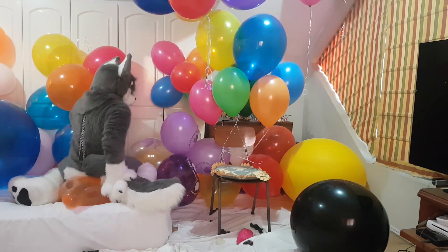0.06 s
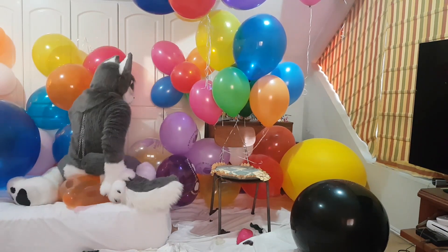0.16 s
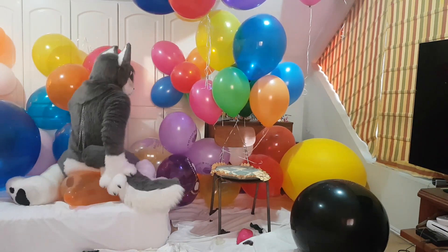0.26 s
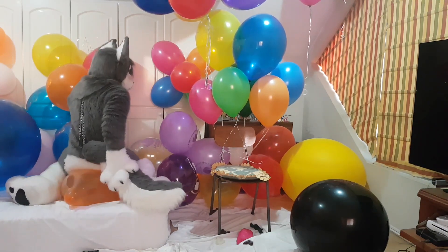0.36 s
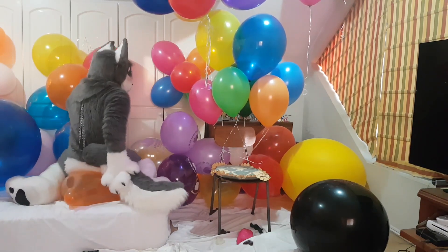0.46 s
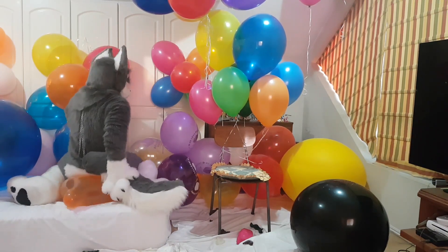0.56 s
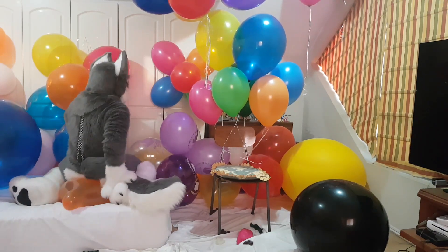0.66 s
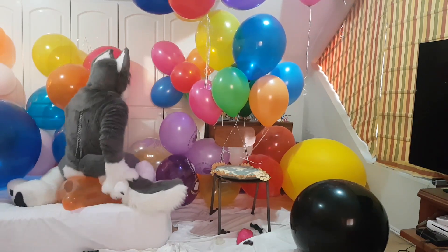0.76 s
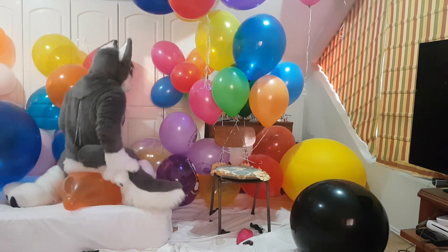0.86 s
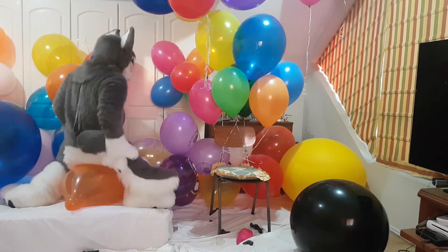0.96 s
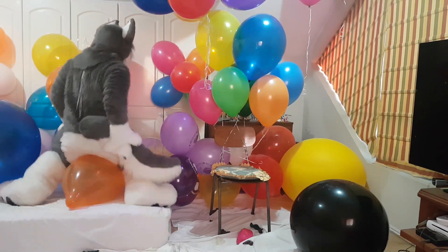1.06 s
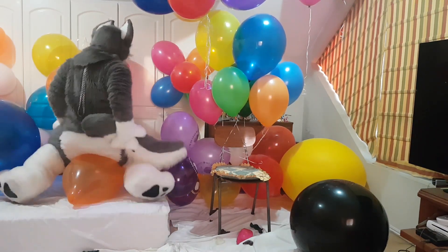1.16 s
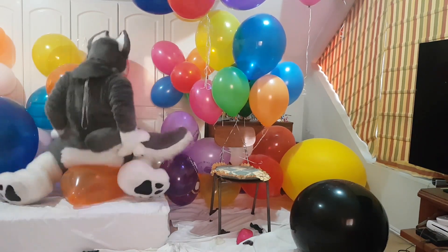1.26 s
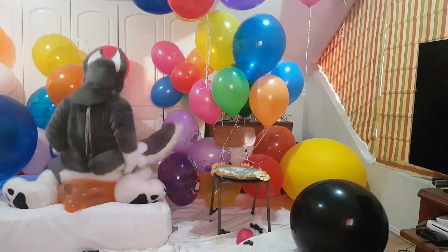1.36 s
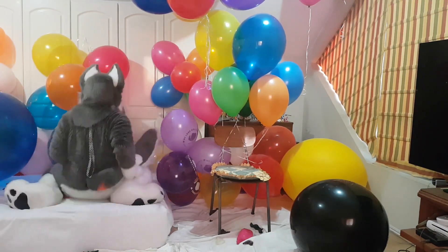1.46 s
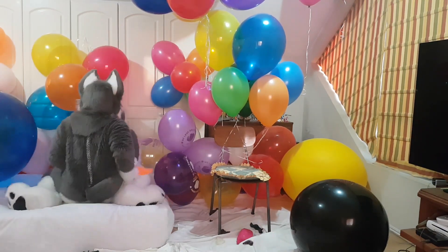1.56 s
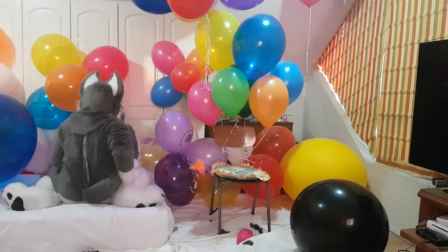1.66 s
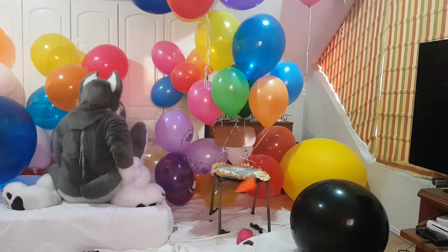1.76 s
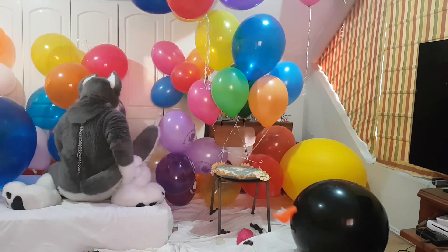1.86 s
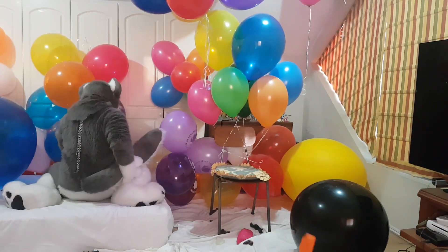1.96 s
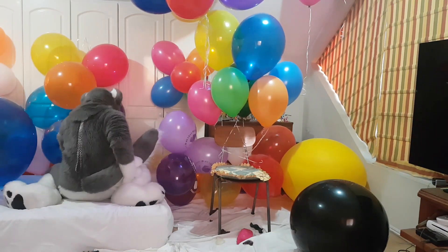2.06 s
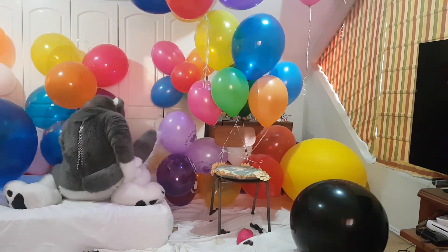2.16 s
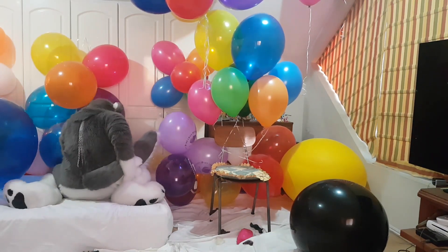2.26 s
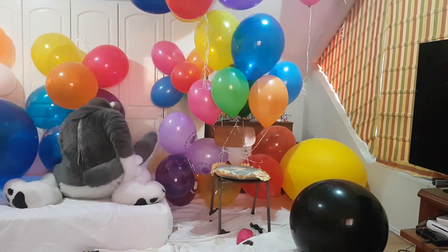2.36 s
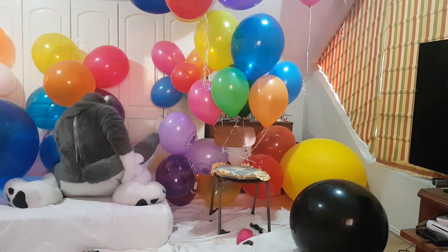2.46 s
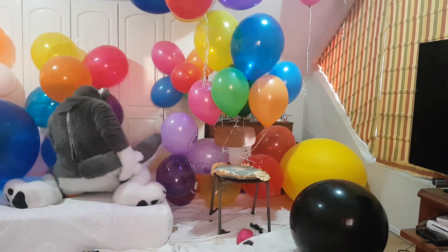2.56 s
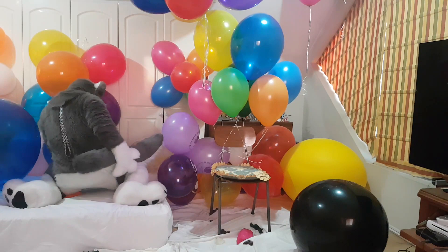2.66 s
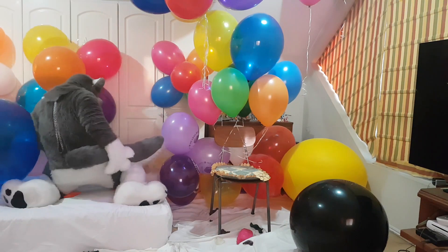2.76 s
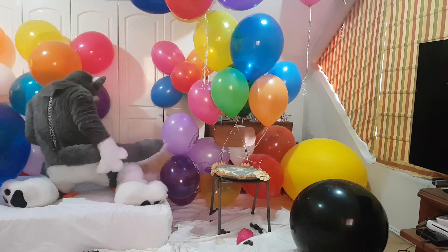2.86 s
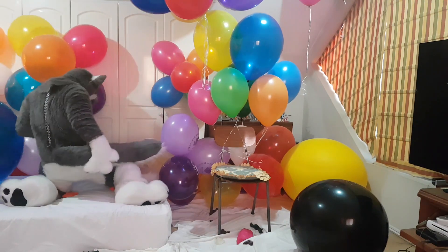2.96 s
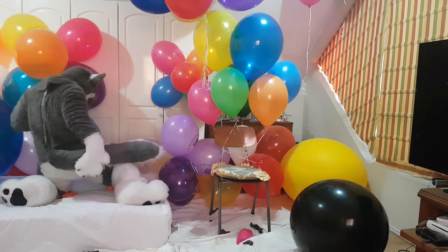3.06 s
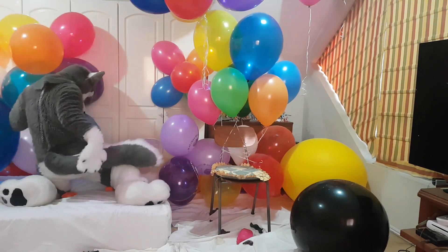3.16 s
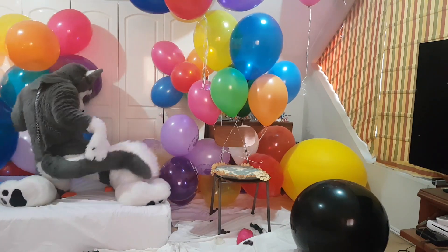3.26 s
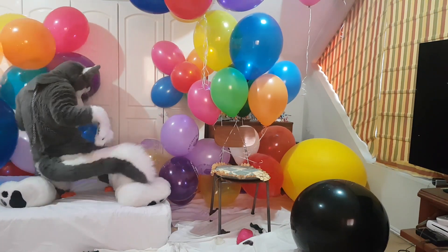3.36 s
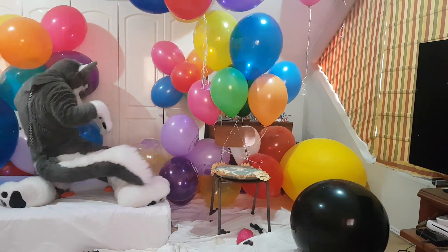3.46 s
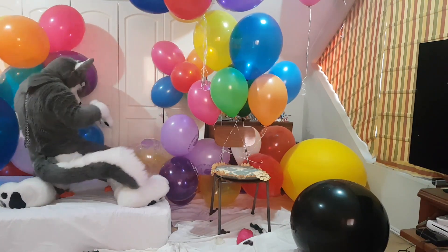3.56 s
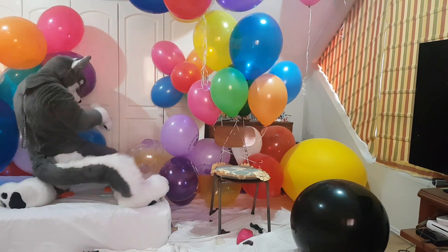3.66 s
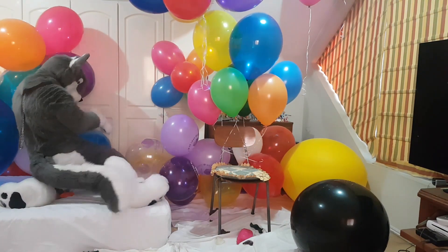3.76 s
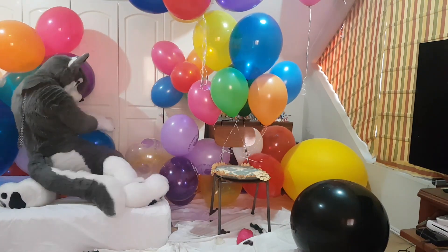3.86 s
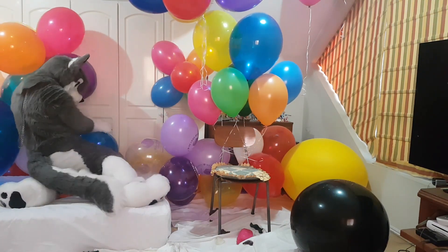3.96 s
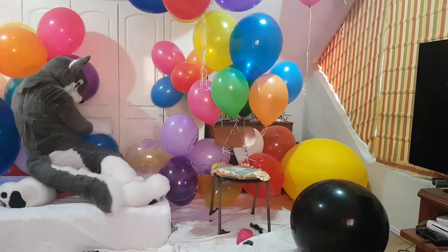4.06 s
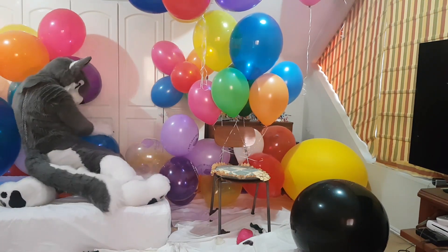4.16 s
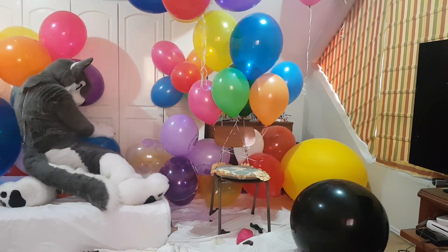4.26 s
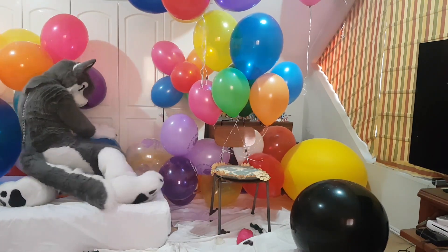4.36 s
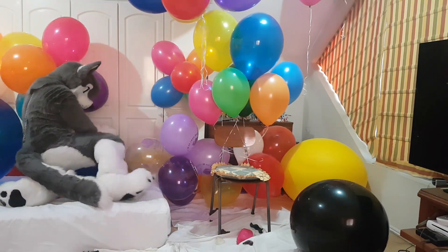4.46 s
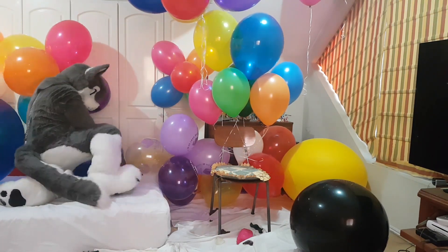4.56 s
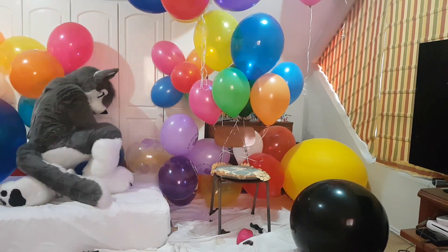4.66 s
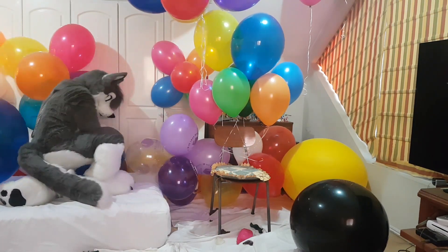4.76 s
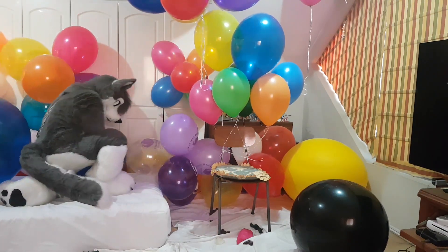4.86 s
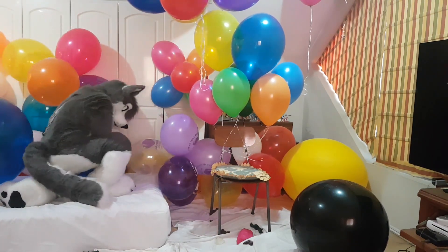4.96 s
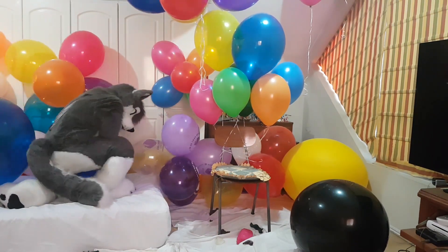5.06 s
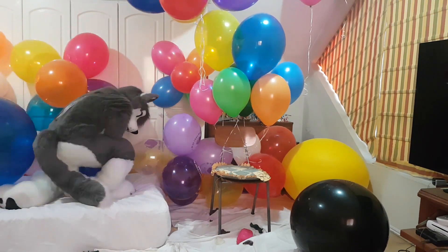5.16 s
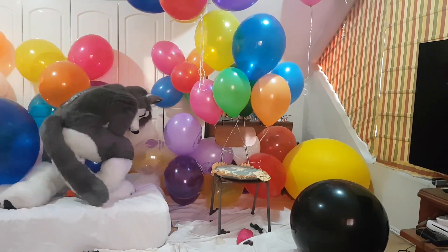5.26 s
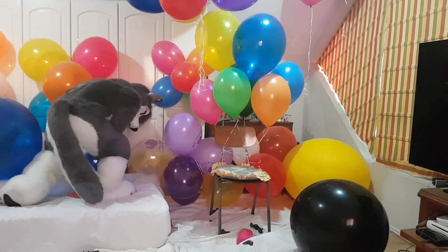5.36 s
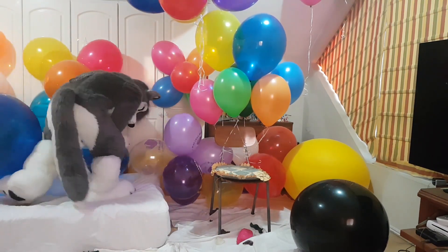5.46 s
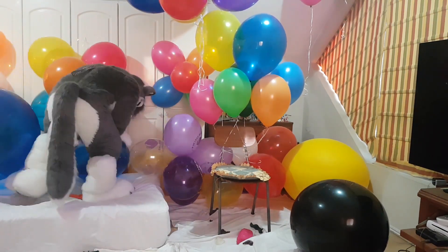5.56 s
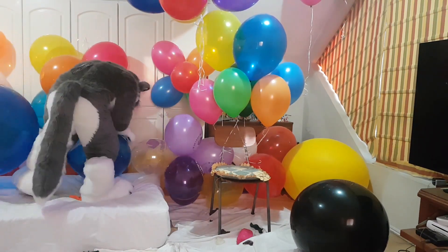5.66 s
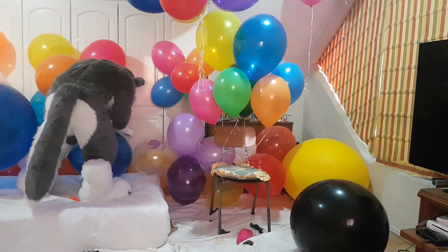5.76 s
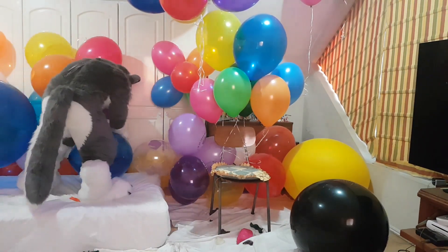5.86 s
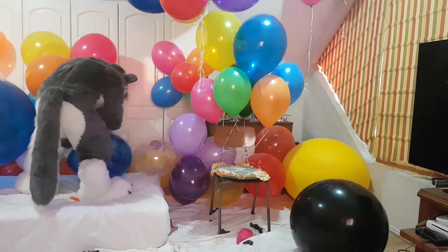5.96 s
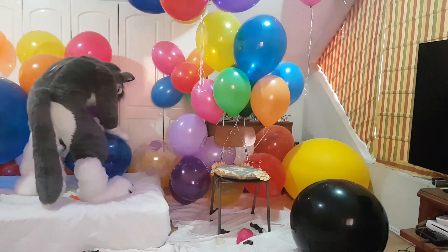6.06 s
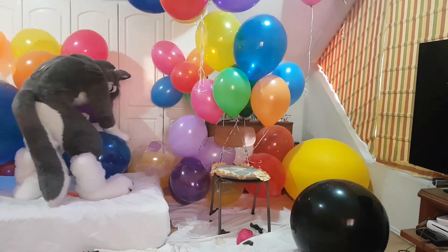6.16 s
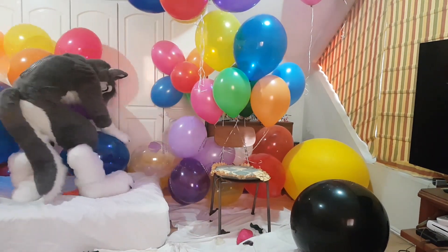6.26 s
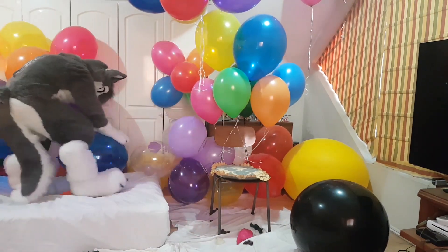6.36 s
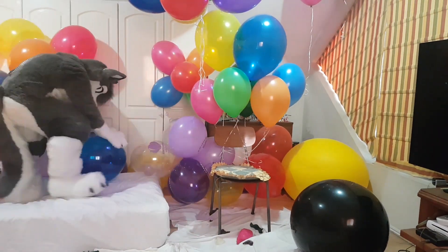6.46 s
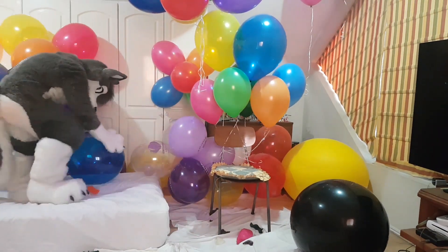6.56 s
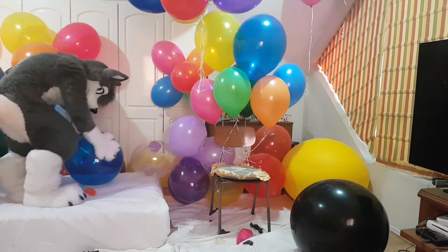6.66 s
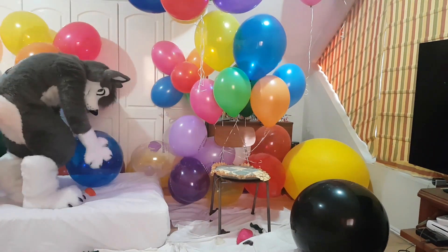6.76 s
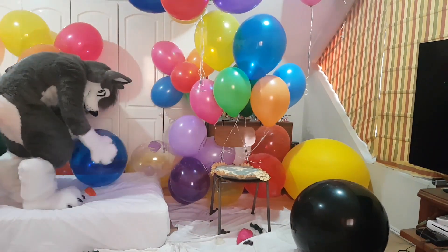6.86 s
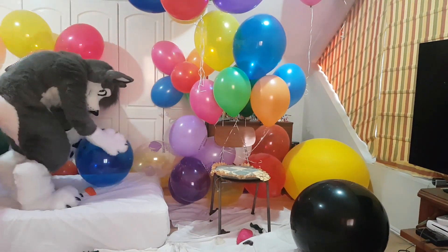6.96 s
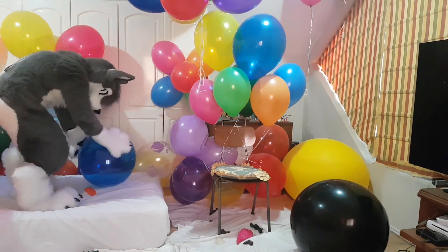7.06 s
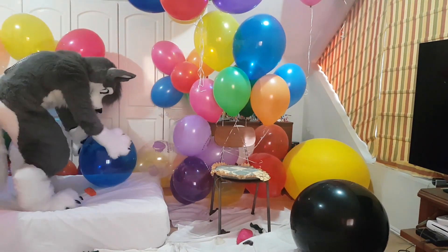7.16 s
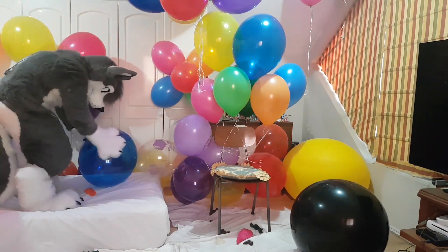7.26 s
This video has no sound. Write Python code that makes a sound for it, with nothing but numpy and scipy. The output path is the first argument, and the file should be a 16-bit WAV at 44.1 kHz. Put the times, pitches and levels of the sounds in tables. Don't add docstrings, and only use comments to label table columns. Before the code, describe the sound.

A person in a furry suit shifts on a mattress among balloons: quiet rustle, rubbery scuffs and soft thumps, quickening just before one violent, clipped balloon burst. The short room tail dies into a ducked hush. Fur and cloth gradually come back, latex jerks and squeaks, groans once and chirps sharply, and the movement grows busiest and loudest in the last second. Close stereo camera microphone, automatic gain.

```python
import sys
import numpy as np
from scipy import signal
from scipy.fft import rfft, irfft
from scipy.io import wavfile
from scipy.ndimage import uniform_filter1d

SR = 44100
rng = np.random.default_rng(int(sys.argv[2]) if len(sys.argv) > 2 else 0)


def generate_wav(signal):
    frames = np.transpose(np.atleast_2d(signal))
    scaled = np.clip(frames, -1, 1) * 32767
    pcm = np.round(scaled).astype(np.int16)
    wavfile.write(sys.argv[1], SR, pcm)


def decibels_to_gain(level_db):
    exponent = np.asarray(level_db, float) / 20
    return 10 ** exponent


N = 322812
BURST_S = 1.5109

# frequency in Hz, likeness -1 to 1.
PORT_LIKENESS = [(60, 0.94), (180, 0.98), (540, 0.59), (1630, -0.45), (4900, 0.32), (14700, 0.012)]
# frequency in Hz, likeness -1 to 1.
BURST_LIKENESS = [(60, .5), (180, .9), (540, .35), (1630, .1), (4900, 0), (9000, -.15), (14700, -.1)]


def evened(x):
    return x / np.sqrt(np.mean(x ** 2) + 1e-20)


def read(points, hz):
    f, value = np.transpose(points)
    return np.interp(np.log(hz + 1), np.log(f + 1), value)


def wander(count, smooth):
    once = uniform_filter1d(rng.standard_normal(count), int(smooth))
    return evened(uniform_filter1d(once, int(smooth)))


def coloured(x, gain_db):
    return irfft(rfft(x) * decibels_to_gain(gain_db), x.shape[-1])


def pair(colour, likeness):
    hz = np.fft.rfftfreq(N, 1 / SR)
    a, b = rfft(rng.standard_normal((2, N)))
    c = np.clip(read(likeness, hz), -1, 1)
    right = c * a + np.sqrt(1 - c ** 2) * b
    return irfft(np.array([a, right]) * decibels_to_gain(colour(hz)), N)


def humps(t, rows, rise_db_per_s, fall_db_per_s):
    s, db, hold = np.transpose(rows)[:3, :, None]
    rise_db = np.maximum(rise_db_per_s * (s - t), 0)
    fall_db = np.maximum(fall_db_per_s * (t - s - abs(hold)), 0)
    return decibels_to_gain(2 * (db - rise_db - fall_db))


def swing(after, hz, db, t60, phase=0.0):
    return decibels_to_gain(db - 60 * after / t60) * np.sin(2 * np.pi * (hz * after + phase))


def slips(rate_hz, orders, jitter):
    turns = np.cumsum(rate_hz * (1 + jitter * wander(len(rate_hz), smooth=35))) / SR
    return evened(sum(decibels_to_gain(db) * np.cos(2 * np.pi * (k * turns + rng.random())) for k, db in orders))


def ducking(t):
    recover_s = [.75, .65, .5, 0.43]
    since, hold_s = t - BURST_S, 0.76
    return (since > 0) * np.clip(1 - (since - hold_s) / np.c_[recover_s], 0, 1)


def moving(t):
    # time in seconds, effort in dB.
    effort = [(0, 0.5), (.2, -5.5), (.75, -3.5), (1.1, 2), (1.35, 0), (2.8, 3), (3.15, 8), (3.6, 1),
              (3.9, -3), (4.2, 2.5), (4.8, -1), (5.02, 3.5), (5.4, 0), (5.9, 6.5), (6.4, 16.5), (6.7, 5.5),
              (7.02, 3), (7.32, 15)]
    bed_level_db = [-68.5, -60, -59.5, -65.5]
    bed_follows = [0.55, 0.45, 0.97, 0.59]
    ducked_db = [19, 15, 17, 15]
    thump_colour_db = [-0.5, -14, -27.5, -33.5]
    stroke_colour_db = [-20.5, -1, -0.5, -14]
    brush_colour_db = [-35.5, -21, -13, 1.5]
    # start in seconds, level in dB, hold in seconds.
    thumps = [(0.185, -57.5, 0.13), (0.447, -63, .01), (0.622, -57.5, 0.11), (0.94, -60.5, 0.2),
              (1.156, -59, .01), (1.24, -46, .01), (1.327, -62, 0.065), (1.435, -41.5, .01),
              (1.502, -43, .02), (1.86, -61.5, 0.2), (2.55, -66, .05), (2.98, -59, .04),
              (3.09, -60, 0.0095), (4.92, -58, .05), (3.68, -56.5, 0.0083), (3.801, -51, 0.1),
              (4.031, -49, 0.053), (4.3, -53, 0.0092), (4.454, -49.5, 0.018), (4.58, -54, 0.011),
              (4.731, -54.5, 0.011), (5.22, -49, 0.015), (5.413, -56, 0.074), (5.66, -56, 0.01),
              (5.775, -50.5, 0.036), (5.896, -45.5, 0.024), (6.034, -41.5, 0.027), (6.285, -55, .01),
              (6.447, -56, 0.0091), (6.563, -38, 0.037), (6.693, -44.5, 0.019), (6.85, -40, 0.13),
              (6.79, -44, .02), (7.3, -43, .02), (1.8, -55, .03), (7.111, -39, 0.012)]
    # start in seconds, level in dB, hold in seconds, balloon body above the rub in dB.
    strokes = [(0.42, -56, 0.082, 8.5), (0.833, -67.5, 0.028, 18.5), (1.17, -61.5, 0.1, 3.5),
               (1.44, -63, 0.036, -2), (1.497, -44, .02, -15), (3.049, -49, 0.0061, -2.5),
               (3.26, -51, 0.15, -14), (3.7, -52.5, 0.031, 0), (3.843, -43.5, 0.011, -20),
               (4.054, -55, 0.017, -8), (4.301, -59, 0.012, 8.5), (4.539, -46, 0.045, 1),
               (4.701, -64, 0.042, -1), (5.168, -39.5, 0.061, 1), (5.361, -42, 0.1, -4.5),
               (5.612, -43, 0.068, -3.5), (5.793, -44, 0.032, -3), (6.026, -36.5, 0.022, -26),
               (6.365, -48, 0.18, 2.5), (6.546, -46, 0.022, -6), (6.85, -44, 0.028, -1),
               (7.123, -50, 0.02, -17), (7.303, -56, 0.024, -12)]
    # start in seconds, level in dB, hold in seconds.
    brushes = [(0.035, -59.5, 0.099), (.28, -61, 0.089), (0.587, -61, 0.099), (0.86, -54, .1),
               (1.045, -50, 0.13), (1.245, -57.5, 0.041), (1.406, -51.5, 0.044), (1.506, -40.5, 0.018),
               (2.74, -59.5, 0.043), (2.89, -55.5, 0.14), (3.21, -55, 0.12), (3.726, -58, 0.057),
               (3.91, -60, 0.039), (4.033, -56, 0.01), (4.17, -61, 0.093), (4.293, -60, 0.038),
               (4.43, -58, 0.16), (4.654, -64.5, 0.031), (5.15, -52.5, 0.029), (5.364, -56.5, 0.12),
               (5.8, -77, 0.032), (6.195, -55, 0.26), (6.523, -46, 0.045), (6.685, -50.5, .02),
               (6.88, -49, 0.028), (7.075, -56, 0.033), (7.24, -58, 0.04)]

    bed_db = np.outer(bed_follows, np.interp(t, *np.transpose(effort)))
    bed_db = bed_db - np.c_[ducked_db] * ducking(t) + np.c_[bed_level_db]
    stroke_db = np.c_[stroke_colour_db] + np.outer([0, 1, 0, 0], [row[3] for row in strokes])
    power = decibels_to_gain(2 * bed_db)
    power += decibels_to_gain(2 * stroke_db) @ humps(t, strokes, rise_db_per_s=141, fall_db_per_s=141)
    landing = humps(t, thumps, rise_db_per_s=251.5, fall_db_per_s=159.5).sum(0)
    power += decibels_to_gain(2 * np.c_[thump_colour_db]) * landing
    fur = humps(t, brushes, rise_db_per_s=149.5, fall_db_per_s=142.5).sum(0)
    power += decibels_to_gain(2 * np.c_[brush_colour_db]) * fur
    return 10 * np.log10(power)


def rustle():
    band_edges_hz = [25, 160, 600, 4000, 14500]
    # frequency in Hz, density in dB per Hz.
    friction = [(12, -38.5), (20, -5), (42, -6), (66, -10.5), (132, -1.5), (242, -6.5), (470, -7.5),
                (540, -10.5), (713, -11.5), (966, -10.5), (1170, -11), (1640, -11.5), (5690, -24),
                (13800, -22), (15000, -33.5)]
    # frequency in Hz, gain in dB.
    port_dip = [(5500, -0.5), (7300, -4.5), (8600, -0.5)]

    noise = pair(lambda f: read(friction, f) + read(port_dip, f), PORT_LIKENESS)
    hz, t, z = signal.stft(noise, SR, nperseg=1024, noverlap=896)
    levels = moving(t)
    edges = np.array(band_edges_hz)
    power = 2 / 1.5 * (abs(z) ** 2).mean((0, 2))
    own_db = [10 * np.log10(power[(hz >= lo) & (hz < hi)].sum()) for lo, hi in zip(edges, edges[1:])]
    lift_db = levels - np.c_[own_db]

    centres = np.sqrt(edges[1:] * edges[:-1])
    bands = np.arange(len(levels))
    place = np.interp(np.log(hz + 1), np.log(centres), bands)
    share = np.maximum(1 - abs(place[:, None] - bands), 0)

    patches = uniform_filter1d(rng.standard_normal(z.shape[1:]), size=8, axis=0)
    patches = evened(uniform_filter1d(patches, size=20, axis=1))
    lumps_db = read([(60, 1.1), (400, 3), (2000, 1.5), (10000, .7)], hz)[:, None] * patches
    z = z * decibels_to_gain(share @ lift_db + lumps_db)
    out = signal.istft(z, SR, nperseg=1024, noverlap=896)[1][:, :N]
    bass = signal.sosfiltfilt(signal.butter(2, 120, fs=SR, output="sos"), out)
    out, bass = (np.array([v[0], np.roll(v[1], 6)]) for v in (out, bass))
    flicker_db = .7 * wander(N, smooth=400) + .9 * wander(N, smooth=30)
    return bass + (out - bass) * decibels_to_gain(flicker_db)


def hum():
    return decibels_to_gain(-77 + 2.5 * wander(N, smooth=3000)) * slips(np.full(N, 112), [(1, 0)], jitter=.09)


def amplifier_hiss():
    duck_db = 10 * ducking(np.arange(N) / SR)[-1]
    return decibels_to_gain(-80.5 - duck_db) * rng.standard_normal((2, N))


def scuffs():
    # frequency in Hz, density in dB per Hz.
    dry_colour = [(59, -32.5), (100, -8.5), (513, -6.5), (814, 0), (1240, -6.5), (1630, -1), (3920, -4.5),
                  (5500, -10), (8880, -22), (15000, -25.5)]
    # start in seconds, level in dB, slips per s, length in seconds, brightness in dB per octave.
    squeaks = [(.247, -53, 335, 0.033, -7), (.252, -58, 960, 0.055, -11), (.245, -61, 1310, .055, -12),
               (0.499, -53, 600, 0.044, -4), (6.06, -50, 480, 0.044, -16), (6.19, -50, 1020, .035, -14),
               (6.98, -57.5, 880, 0.064, -16), (6.82, -45, 1800, .04, -9), (4.545, -45, 135, 0.062, -10),
               (4.2, -57, 356, 0.063, -17), (0.69, -55, 407, 0.053, -8), (0.74, -54, 410, 0.024, -16),
               (0.803, -56, 430, 0.052, -24), (0.849, -51.5, 420, 0.018, -11),
               (0.903, -54.5, 400, 0.036, -18), (1.165, -39, 268, 0.043, -39), (1.234, -48, 118, 0.02, 1),
               (3.29, -51.5, 540, 0.056, -12), (3.425, -60.5, 505, 0.12, -15), (3.49, -60, 500, 0.077, -21),
               (3.53, -58, 500, 0.068, -21), (3.23, -59.5, 560, 0.077, -14), (3.28, -55.5, 355, 0.073, -14),
               (3.28, -59, 620, .05, -14), (3.263, -54, 2070, .035, -14), (3.83, -41, 820, 0.026, -0.5),
               (3.885, -53.5, 910, 0.03, -13), (5.265, -43.5, 460, 0.085, -20),
               (5.893, -48, 1100, 0.035, -15), (5.988, -59, 46, 0.11, -10), (6.55, -48, 123, 0.085, -6),
               (6.823, -50, 45, 0.1, -14), (6.853, -41, 112, 0.063, -1), (7.184, -44.5, 1070, 0.044, -11),
               (7.205, -45, 1350, 0.047, -14), (7.212, -45.5, 1630, .035, -18),
               (7.216, -48, 1040, 0.044, -12), (7.255, -48, 840, 0.022, -9), (7.288, -47, 1130, 0.023, -13)]
    # start in seconds, level in dB, slips per s, length in seconds, squeak share 0-1.
    rubs = [(0.372, -44.5, 490, 0.038, 0.87), (0.487, -46, 520, 0.062, 0.52),
            (1.429, -46.5, 130, 0.022, 0.7), (3.019, -53.5, 360, 0.15, 0.01),
            (3.228, -49, 2440, 0.05, 0.65), (3.399, -57, 1460, 0.07, 0.5), (3.399, -55, 1660, 0.073, .6),
            (3.263, -53, 2000, 0.034, 0.4), (3.656, -45, 292, 0.03, 0.73), (4.247, -52.5, 330, 0.043, 0.13),
            (4.506, -43, 570, 0.069, 0.28), (5.388, -46, 2500, 0.06, 0.54), (5.94, -47.5, 1400, 0.044, 0.7),
            (5.976, -41, 790, 0.063, 0.3), (6.051, -44.5, 480, 0.09, 0.27), (6.35, -45.5, 322, 0.17, 0.78),
            (6.43, -48, 170, .08, 0.6), (6.8, -42, 690, 0.028, 0.1), (7.167, -45, 790, 0.033, 0.1)]
    # start in seconds, level in dB, slips per s, length in seconds, brightness in dB per octave.
    chirps = [
        (0.379, -42, 325, 0.073, -0.5),
        (5.559, -33.5, 860, 0.053, -0.5),
        (5.574, -34, 700, .04, -1.5),
        (5.588, -39, 2550, 0.035, -5),
        (5.611, -43, 890, 0.028, -4),
        (6.008, -31.5, 960, 0.037, -1),
        (5.985, -42, 2900, 0.038, -8),
        (5.99, -43.5, 2500, .02, -9),
        (5.58, -38, 1620, .04, -4),
    ]
    # start in seconds, level in dB, slips per s, length in seconds, brightness in dB per octave.
    jerks = [
        (3.796, -36, 820, 0.041, 1),
        (3.797, -37.5, 1650, 0.045, -2),
        (3.799, -40, 2480, 0.038, -2),
        (6.823, -33.5, 2700, 0.026, 0.5),
        (6.826, -37.5, 5050, 0.025, -6),
        (6.833, -36.5, 2200, 0.025, -2),
        (6.849, -35.5, 2350, 0.033, -2.5),
    ]

    rows = [(*row, .94, .8) for row in squeaks]
    rows += [(*row[:4], -3.5, row[4], .8) for row in rubs]
    rows += [(*row, .64, .9) for row in chirps]
    rows += [(*row, .68, .5) for row in jerks]
    out, t = np.zeros(N + 8192), np.arange(8192) / SR
    hz = np.fft.rfftfreq(len(t), 1 / SR)
    for s, level_db, rate_hz, length, tilt_db, share, skew in rows:
        share = np.clip(share, 0, 1)
        orders = [(k, (tilt_db - 5.0) * np.log2(k)) for k in range(1, 6) if k * rate_hz < 9000]
        squeak = slips(rate_hz + 0 * t, orders, jitter=.035 + .07 * (1 - share))
        tint_db = read(dry_colour, hz) + tilt_db * np.log2(hz / 800 + .1)
        dry = evened(coloured(rng.standard_normal(len(t)), tint_db))
        stroke = np.sin(np.pi * np.clip(t / length, 0, 1) ** skew) ** 1.5
        stroke = stroke * decibels_to_gain(2 * wander(len(t), smooth=80))
        at = round(s * SR)
        out[at:at + len(t)] += decibels_to_gain(level_db) * stroke * (np.sqrt(share) * squeak + np.sqrt(1 - share) * dry)
    return out[:N]


def room(x):
    # frequency in Hz, t60 in seconds.
    decay = [(100, .36), (500, .36), (1000, .36), (2000, .32), (8000, .3), (14000, .26)]
    taps = np.zeros((2, SR // 2))
    at = np.arange(150, SR // 2 - 20, 20)
    signs_shape = (2, len(at))
    at = at + rng.integers(0, 20, signs_shape)
    np.put_along_axis(taps, at, rng.choice([-1., 1.], signs_shape), 1)
    hz, t, z = signal.stft(taps, SR, nperseg=256)
    tail = signal.istft(z * decibels_to_gain(-60 * t / read(decay, hz)[:, None]), SR, nperseg=256)[1]
    return signal.fftconvolve(x[None], tail / np.linalg.norm(tail[0]), axes=1)[:, :N]


def flicks():
    # start in seconds, level in dB, hold in seconds, top above middle treble in dB,
    # chatter per s (1 or less: none).
    contacts = [(0.382, -44.5, 0.028, -4.5, 320), (0.492, -57, .03, 0, 320), (3.52, -57, 0.016, 0, 1),
                (3.672, -63, 0.011, 0, 0), (3.799, -50.5, 0.024, 2, 0), (5.558, -48, 0.02, 2, 0),
                (5.57, -48, 0.019, -2, 0), (5.957, -53, 0.018, -10, 3), (5.99, -50, .015, -8, 2),
                (6.01, -48, .015, -5, -0.5), (6.455, -42, 0.023, 3.5, 0), (6.728, -47, .01, 8.5, 0.5),
                (6.746, -41.5, 0.014, 2, 0), (6.821, -31.5, 0.02, -1.5, 0), (6.858, -50, .012, -2, 1)]
    # frequency in Hz, density in dB per Hz.
    fur_middle = [(2000, -11), (4000, -0.5), (6500, -3.5), (9000, -5.5), (11000, -40)]
    # frequency in Hz, density in dB per Hz.
    fur_top = [(6000, -20), (9000, 1), (13000, 2), (15000, -7)]

    t = np.arange(0, N, 10) / SR
    top_db, chatter_hz = np.transpose(contacts)[3:]
    chatter_hz = chatter_hz[:, None]
    power = humps(t, contacts, rise_db_per_s=2200, fall_db_per_s=280)
    chatter = (1 + np.cos(2 * np.pi * chatter_hz * t)) ** 2 / 1.5
    power = power * np.where(chatter_hz > 1, chatter, 1)
    middle = evened(pair(lambda f: read(fur_middle, f), PORT_LIKENESS))
    top = evened(pair(lambda f: read(fur_top, f), PORT_LIKENESS))
    gains = np.sqrt([power.sum(0) / 2, decibels_to_gain(2 * top_db) @ power / 2])
    middle_gain, top_gain = np.repeat(gains, 10, axis=1)[:, :N]
    return (middle * middle_gain + top * top_gain) * decibels_to_gain(1.1 * wander(N, smooth=31))


def shock_front(since):
    # seconds after the burst, level in dB, swing in Hz, t60 in seconds.
    returns = [(.0008, -11, 235, .04), (.0022, -2, 340, .025), (.0032, -10, 600, .04),
               (.0045, -10, 2800, .02), (.074, -14, 100, .15), (.0105, -8, 280, .03),
               (.0277, -2, 800, .018), (.0503, -3, 270, .035), (.0658, -4, 205, .035),
               (.0727, -2.5, 178, .12), (.0905, -6, 215, .06), (.131, -8, 290, .08)]
    # seconds after the burst, level in dB, swing in Hz, t60 in seconds.
    sideways = [
        (.004, -12, 245, .08),
        (.008, -16, 1100, 0.092),
        (.042, -17, 550, .07),
        (.07, -12, 110, .06),
        (.064, -18, 420, .06),
        (.085, -17, 270, .15),
    ]
    port_lag_s, length_s = .00022, .0009
    u = np.maximum(since - np.c_[[0, port_lag_s]], 0) / length_s
    shock = decibels_to_gain(9) * (u > 0) * (1 - u) * np.exp(-u)
    for s, db, swing_hz, t60 in returns:
        shock = shock - swing(np.maximum(since - s, 0), swing_hz, db, t60)
    for s, db, swing_hz, t60 in sideways:
        shock = shock + np.c_[[1, -1]] * swing(np.maximum(since - s, 0), swing_hz, db, t60)
    return shock


def boom(t, since, span):
    # frequency in Hz, density in dB per Hz.
    boom_colour = [(15, -53), (25, -24), (64, -18.5), (97, -9.5), (128, -5.5), (165, -5), (199, -3.5),
                   (285, -3.5), (334, -9.5), (362, -8), (472, -21.5), (518, -18.5), (600, -24), (780, -52),
                   (1320, -120)]
    # frequency in Hz, level in dB.
    room_modes = [(113, -18.5), (170, -17), (211, -13), (246, -9), (310, -9)]
    # start in seconds, level in dB, hold in seconds.
    surges = [
        (1.517, -15.5, 0.0019),
        (1.598, -12, 0.0085),
        (1.646, -18.5, 0.004),
        (1.705, -27, .01),
        (1.928, -62.5, 0.037),
        (2.054, -66, 0.0048),
    ]
    surge = np.sqrt(humps(t, surges, rise_db_per_s=302.5, fall_db_per_s=190).sum(0))
    modes = 0
    for hz, db in room_modes:
        level = decibels_to_gain(db + 2.5 * wander(len(t), smooth=700))
        phase = rng.random() + 0.057 * rng.standard_normal((2, 1))
        modes = modes + level * np.sin(2 * np.pi * (hz * since + phase))
    air = evened(pair(lambda f: read(boom_colour, f), BURST_LIKENESS))[:, span]
    return (0.77 * air + modes) * surge


def crack(since, span):
    # frequency in Hz, density in dB per Hz.
    crack_colour = [(290, -31.5), (500, -5), (673, -3.5), (722, -8.5), (820, -4), (1340, -11.5),
                    (1910, -10.5), (1990, -13), (2360, -10), (3710, -16), (4040, -13), (13200, -16.5),
                    (14600, -16.5)]
    # frequency in Hz, gain in dB.
    early = [(500, 5.5), (1000, 4.5), (1900, 12), (2800, 13), (5000, 5), (12000, 8.5)]
    # frequency in Hz, loss in dB per s.
    loss = [(500, 15), (1000, -20), (2000, 14.5), (8000, 10.5), (11500, 30), (14000, 60), (15000, 130)]
    limited_s = 0.14
    level_db = -8.5 - 114 * np.minimum(since, limited_s) - 202 * np.maximum(since - limited_s, 0)
    noise = evened(pair(lambda f: read(crack_colour, f), BURST_LIKENESS))[:, span]
    hz, frames, z = signal.stft(noise, SR, nperseg=256, noverlap=192)
    age = np.minimum(frames, .5)
    z = z * decibels_to_gain(np.outer(read(early, hz), np.exp(-age / .03)) - np.outer(read(loss, hz), age))
    noise = signal.istft(z, SR, nperseg=256, noverlap=192)[1][:, :len(since)]
    return noise * decibels_to_gain(level_db + 2.2 * wander(N, smooth=60)[span])


def ringing(since):
    # frequency in Hz, level in dB, t60 in seconds.
    neighbours = [(113, -23, 1.2), (800, -12, .4), (937, -6, .48), (1082, -11, .4), (1228, -7, .5),
                  (1362, -13, .45)]
    # frequency in Hz, level in dB, t60 in seconds.
    shreds = [(1526, -16.5, 0.21), (1780, -16.5, .13), (1892, -15.5, 0.14), (2090, -18, 0.15),
              (2350, -18, .13), (2800, -15, 0.11), (8760, -24.5, 0.2), (11480, -24.5, 0.22),
              (12590, -24, 0.27)]
    out = 0
    for hz, db, t60 in neighbours:
        phase = rng.random() + 0.08 * rng.standard_normal((2, 1))
        out = out + swing(since, hz, db - 18.5, t60, phase)
    for hz, db, t60 in shreds:
        out = out + swing(since, hz, db, t60, rng.random((2, 1)))
    return out


def burst():
    span = slice(round(BURST_S * SR), round((BURST_S + 1.5) * SR))
    t = np.arange(N)[span] / SR
    since = np.maximum(t - BURST_S, 0)
    swell = 1 - np.exp(-(since / .0008) ** 2)
    bang = np.zeros((2, N))
    bang[:, span] = shock_front(since) + swell * (boom(t, since, span) + crack(since, span) + ringing(since))
    return signal.sosfilt(signal.butter(2, 75, "high", fs=SR, output="sos"), bang)


def groan():
    # time in seconds, level in dB, slips per s.
    drag = [
        (5.05, -44.5, 209),
        (5.11, -37, 209),
        (5.15, -30, 213),
        (5.172, -30.5, 225),
        (5.188, -19.5, 227),
        (5.205, -21.5, 225),
        (5.221, -21, 225),
        (5.236, -30, 233),
        (5.262, -43, 236),
    ]
    # multiple of the slip rate, level in dB.
    multiples = [(1, -11), (2, 3.5), (3, -17), (4, -8), (4.6, -16), (5, -18), (6, -15), (7, -36), (8, -30)]
    # time in seconds, gain in dB.
    upper_fade = [(5.1, 0), (5.2, 0.5), (5.222, -9)]
    s, level_db, rate_hz = np.transpose(drag)
    t = np.arange(N) / SR
    rate = np.interp(t, s, rate_hz)
    tone = slips(rate, multiples[1:2], jitter=.018)
    upper = slips(rate, multiples[2:], jitter=.025)
    tone += decibels_to_gain(-9.5 + np.interp(t, *np.transpose(upper_fade))) * upper
    tone *= np.interp(t, [5.09, 5.12], [.15, 1])
    tone += decibels_to_gain(-6.5) * slips(208 + 0 * t, [(0.99, 0)], jitter=0.023)
    rasp_db = -11 * abs(np.log2(np.fft.rfftfreq(N, 1 / SR) / 700 + .01))
    rasp = evened(coloured(rng.standard_normal(N), rasp_db))
    edge = np.interp(t, [s[0] - .02, s[0], s[-1], s[-1] + 0.024], [0, 1, 1, 0])
    return edge * decibels_to_gain(np.interp(t, s, level_db)) * (tone + 0.2 * rasp)


def scene():
    bang, rubs, drag = burst(), scuffs(), groan()
    wet = room(decibels_to_gain(-4.5) * rubs + decibels_to_gain(-16) * drag)
    hiss = amplifier_hiss()
    near = decibels_to_gain(0.5) * rubs + decibels_to_gain(-1.0) * drag
    return np.array([near, np.roll(near, 5)]) + wet + rustle() + flicks() + bang + hiss + hum()


def roll_off(x):
    return signal.sosfilt(signal.butter(12, 15320, fs=SR, output="sos"), x)


def record(dry):
    # time in seconds, share removed 0-1.
    top_dulling = [(1.7, 0), (1.77, .9), (1.98, .7), (2.26, .5), (2.38, 0)]
    clipped = np.clip(dry, -.93, .93)
    top = signal.sosfiltfilt(signal.butter(6, 11800, "high", fs=SR, output="sos"), clipped)
    dulled = clipped - np.interp(np.arange(N) / SR, *np.transpose(top_dulling)) * top
    band_limit = signal.firwin(511, 14750, fs=SR)
    return roll_off(signal.oaconvolve(dulled, band_limit[None], "same"))


dry = scene()
out = record(dry)
generate_wav(out)
```